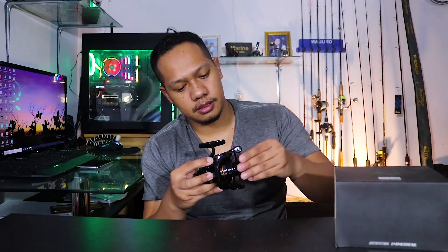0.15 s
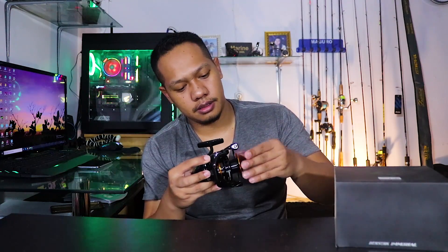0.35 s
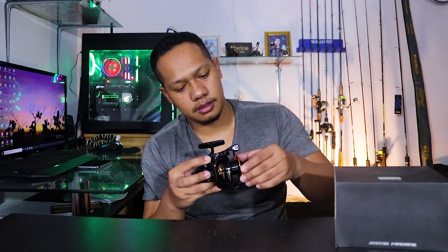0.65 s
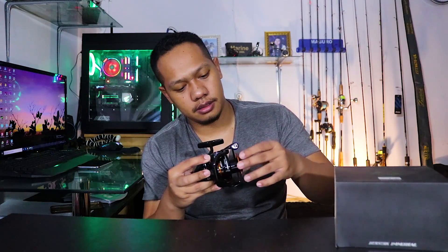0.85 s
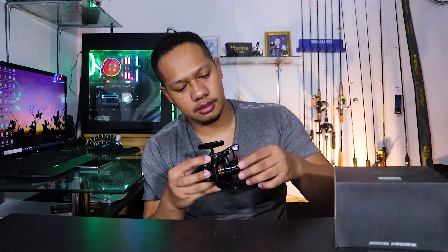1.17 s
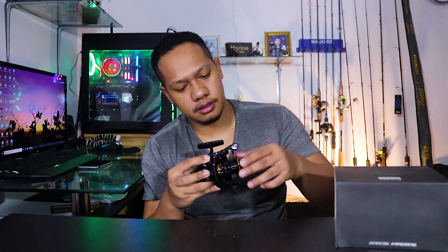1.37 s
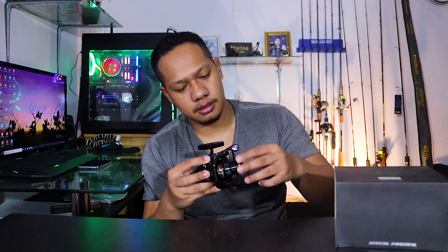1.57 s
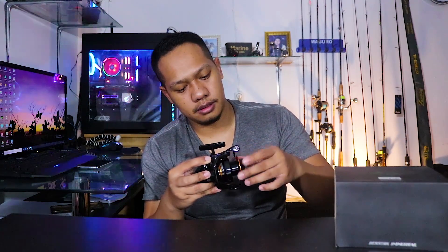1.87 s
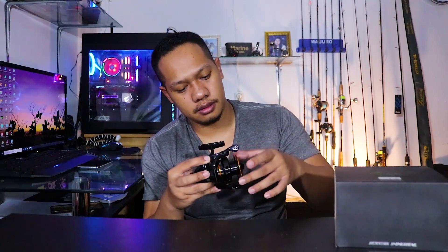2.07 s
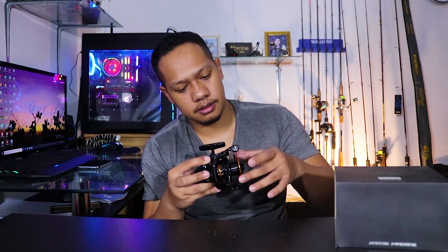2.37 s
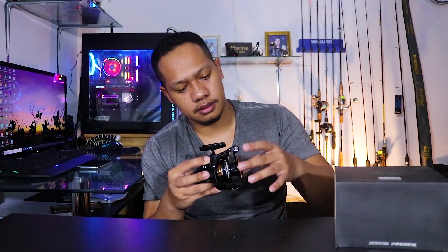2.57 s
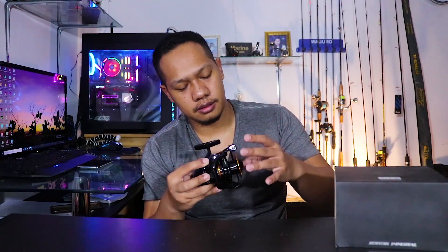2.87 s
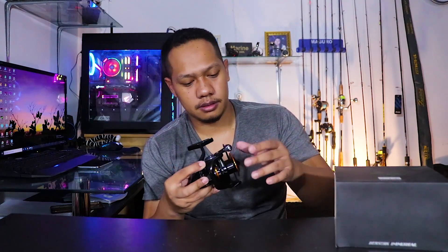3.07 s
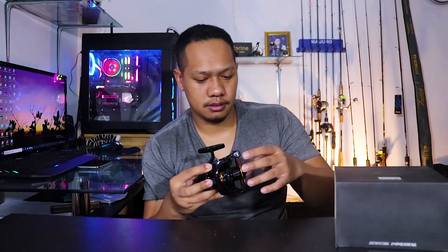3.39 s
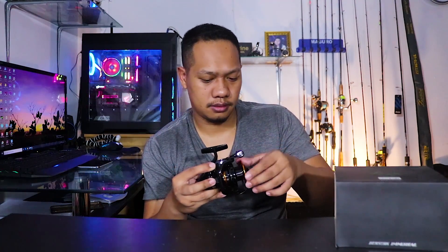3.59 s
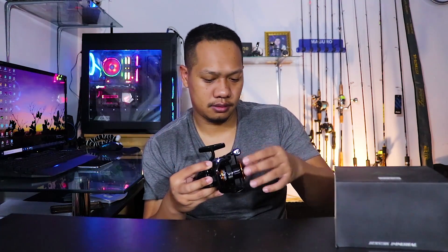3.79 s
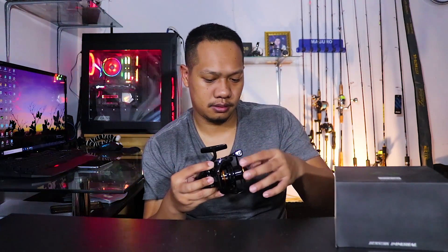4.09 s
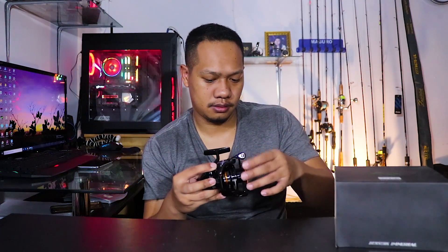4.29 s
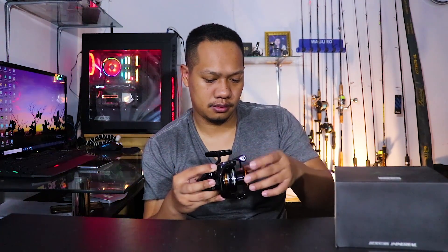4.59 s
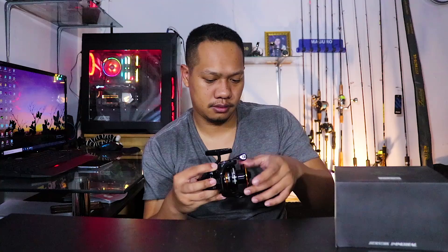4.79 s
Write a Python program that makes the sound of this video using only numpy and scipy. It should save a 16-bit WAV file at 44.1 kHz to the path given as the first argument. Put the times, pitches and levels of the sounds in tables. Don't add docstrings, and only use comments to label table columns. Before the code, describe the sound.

A close, dry stereo pickup in a small quiet room, with low computer fan hum and soft hiss throughout. A faint finger tick leads to one crisp metallic snap at 0.17 s, then weak slips until 0.3. Softer slipping clicks come around 0.8-0.9. Four hard, bright snaps run from 1.29 to 1.39, three more near 1.67-1.70, and four at 1.97-2.04. Around 2.3-2.4 three snaps are looser, with a clear thin high whistle just after 2.0 and 2.3. Lighter triplets fall at 2.57-2.61 and 2.85-2.89. From 3 to 3.7 it is mostly fans, with tiny slips near 3.4 and finger ticks. Strong four-click runs return at 3.75-3.82 and 4.07-4.13, then weaker clicks around 4.4 and faint slips at 4.7. Each run leaves a thin, wavering metallic ring, cut off by the next grip.

```python
import sys
import numpy as np
from scipy import signal
from scipy.fft import rfft, irfft, next_fast_len
from scipy.io import wavfile
from scipy.ndimage import uniform_filter1d

SR = 44100
rng = np.random.default_rng(int(sys.argv[2]) if len(sys.argv) > 2 else 0)


def unload_wav(signal):
    wavfile.write(
        sys.argv[1],
        SR,
        np.round(np.clip(np.atleast_2d(signal).T, -1, 1) * 32767).astype(np.int16),
    )


def amplitude_ratio(level_db):
    exponent = np.asarray(level_db, float) / 20
    return 10 ** exponent


N = 218030

# t/s, body crack level/dB, spool lip and spool skirt re crack/dB
SNAPS = [(0.1676, -23, -3.5, 0), (1.2876, -16.5, -10, 9), (1.3142, -16.5, -1, 2), (1.343, -15, -3, 1.5),
         (1.3877, -18, -14, 3.5), (1.6655, -14.5, -23, 10.5), (1.682, -17, -9, 9),
         (1.7013, -17.5, -23, 9.5), (1.969, -17, -17, 7.5), (1.9952, -13.5, -16, 5.5),
         (2.0124, -19.5, -9, 9), (2.037, -21.5, -1, 1), (2.3049, -17.5, -9, 4), (2.3257, -21.5, -10, -1),
         (2.3977, -26, -1.5, 0), (2.5745, -24, 0, 10), (2.5901, -24, -21, 6), (2.6077, -26, -8, -3),
         (2.8509, -22.5, -19, -5), (2.876, -22, -5, 2), (2.892, -20, -5.5, -2), (3.7486, -14, -28, 6),
         (3.7652, -16, -6.5, 17), (3.785, -18, -29, 12), (3.8227, -19.5, -3, 13.5),
         (4.0747, -12.5, -24, -3), (4.0891, -20.5, -6, 12), (4.1047, -21.5, 1, 12.5),
         (4.1272, -20.5, -30, 6), (4.4009, -24.5, -2, -6)]
# t/s, body crack level/dB, spool lip and spool skirt re crack/dB
SLIPS = [(0.197, -33.5, -11, 5), (0.202, -34.5, -0.5, -8), (0.224, -55, -12, -13), (0.229, -49, -11, -10),
         (0.258, -37, 2, -11), (0.3148, -26.5, -10, -1), (0.7904, -28.5, -2, 10.5), (0.8272, -32, -4.5, 10),
         (0.8522, -31, -8, 3), (0.8588, -27, -10, 1), (0.8853, -31.5, -14, -4), (0.896, -34, -3, 3),
         (2.6, -34, -5, -4), (2.843, -30.5, -6, -12), (2.8699, -26, -22, -11), (2.9117, -34, -1.5, 1),
         (3.412, -35, -7.5, 3), (3.4314, -48, -7, -10), (3.439, -47, -5, 0), (3.853, -49, 9, 21),
         (4.065, -40, -13, -16), (4.1598, -41.5, 6, -12), (4.3744, -27, -12, 3), (4.3957, -35, 6, -7),
         (4.4204, -31, -5, 5.5), (4.4427, -34.5, 4, -2), (4.6885, -35.5, 0, 8), (4.7052, -36.5, 7.5, 9),
         (4.7091, -28, -5.5, -6), (4.7325, -39, -11, 0)]
# t/s, body crack level/dB, frame knock re crack/dB
FINGER_TICKS = [(0.1482, -42.5, -4), (0.2893, -42, -15), (0.4121, -49, -13), (0.754, -48, -8),
                (0.776, -40, -27), (1, -46.5, -9), (1.2213, -49, -9), (1.2387, -47, -1.5),
                (1.6343, -44, -1), (1.6397, -40, -6), (1.6553, -39, -9), (2.277, -38, -17),
                (2.29, -35.5, -3), (2.481, -46, -12), (2.5396, -49, -9), (2.5488, -45, 1.5),
                (2.557, -41.5, -14), (3.3774, -55, 4), (3.488, -43.5, -13), (3.7153, -44, -15),
                (3.7223, -31.5, -10.5), (3.728, -40, -11), (3.7403, -41, -18), (4.0454, -36.5, -18),
                (4.056, -33.5, -4), (4.2257, -46, -13), (4.3719, -37, -6.5), (4.6656, -35.5, -12),
                (4.6767, -42, -3), (4.7854, -54, -11)]
# f/Hz, level/dB, t60/s
BODY_MODES = [(5395, -14, 0.0023), (5900, -9, 0.0055), (6687, -1.5, 0.0056), (7600, 0, 0.004),
              (8210, -3.5, 0.0036), (9250, -6, 0.017), (4640, -7.5, 0.0022), (3940, -15.5, 0.011)]
# f/Hz, level/dB, t60/s
FRAME_MODES = [(1490, -16, 0.01), (2138, -2.5, 0.0053), (2564, -0.5, 0.0083), (3020, -1, 0.0048),
               (3260, -8, 0.0029)]
# f/Hz, level/dB, t60/s
LIP_MODES = [(9600, -1, .026), (9655, -4, .04), (9628, -16, .14)]
# f/Hz, level/dB, t60/s
SKIRT_MODES = [(12085, -19, .07), (12170, 1, .008), (12330, -4, .007), (11700, -5, .005), (12900, -8, .005)]
# f/Hz, level/dB, t60/s
SPRING_MODES = [(14265, -8, .028), (14400, -4, .006), (15600, -6, .007), (13600, -7, .005),
                (15000, -6, .005), (16200, -17, .004)]
# f/Hz, level/dB, t60/s
RIM_MODES = [(10990, 1, 0.0026), (10270, 5.2, 0.0023), (9820, 6, 0.01), (9780, 5, 0.0023)]
# t/s, peak level/dB of lower tone, of upper tone
SINGING = [(0.166, -51.5, -54), (0.317, -63, -53.5), (0.791, -50.5, -52), (0.884, -57, -47.5),
           (1.289, -44.5, -66), (1.349, -41, -46), (1.667, -44, -64), (1.715, -44, -68), (1.97, -52, -52),
           (2.014, -46, -53), (2.089, -54.5, -69), (2.307, -44, -54), (2.335, -43.5, -54),
           (2.401, -49, -50), (2.574, -48, -67), (2.616, -46.5, -46.5), (2.853, -44.5, -67),
           (2.895, -50.5, -48), (3.45, -59, -60), (3.75, -45, -57), (3.802, -37, -56), (4.073, -41.5, -65),
           (4.135, -57, -45.5), (4.4, -50, -57), (4.708, -48, -65)]
# t/s, peak level/dB
WHISTLES = [(0.42, -60), (1.289, -50), (1.667, -52), (2.014, -26), (2.089, -46), (2.307, -26.5),
            (2.401, -34.5), (2.574, -58), (2.91, -34), (3.305, -58), (3.824, -49), (4.445, -61)]
# f/Hz, density level/dB per Hz
FLOOR_SPECTRUM = [(15, -44), (25, -11), (64, -6), (277, -11), (1370, -20.5), (4030, -27), (14800, -32),
                  (16000, -25.5)]
# f/Hz, bandwidth/Hz, level/dB
FAN_TONES = [(69.5, 13.4, -62.5), (117.3, 4.3, -68.5), (170.2, 5.8, -60), (171.5, 37, -67.5),
             (640, 34, -76.5), (1386, 50, -77)]
# f/Hz, correlation/0-1
FLOOR_LIKENESS = [(40, 0.08), (120, 1), (300, 0.25), (1000, 0.35), (3000, 0.39), (15000, 0.23)]


def contacts():
    rows = [(s, db, -17, lip, skirt, 0) for s, db, lip, skirt in SNAPS]
    rows += [(s, db, -17.5, lip, skirt, -0.5) for s, db, lip, skirt in SLIPS]
    rows += [(s, db, frame, -30, -11.5, -23) for s, db, frame in FINGER_TICKS]
    return np.array(rows)


def chatter(count, bounce_s, share, size=220):
    draw = rng.random((count, 2, size))
    happens = draw[:, 0] < share
    strength = 2 * draw[:, 1] - 1
    force = happens * strength * np.exp(-np.arange(size) / SR / bounce_s)
    force[:, 0] = 0.86
    return force / np.sqrt(np.sum(force ** 2, axis=1, keepdims=True))


def ring(force, hz, t60_s):
    r = amplitude_ratio(-60 / (t60_s * SR))
    w = 2 * np.pi * hz / SR
    return signal.lfilter([0, np.sin(w)], [1, -2 * r * np.cos(w), r * r], force + 1e-18)


def reel():
    rows = contacts()
    blows = chatter(count=len(rows), bounce_s=0.0018, share=0.1)
    blow_n = np.arange(blows.shape[1])
    where = (rows[:, :1] * SR).astype(int) + blow_n

    parts = [BODY_MODES, FRAME_MODES, LIP_MODES, SKIRT_MODES, SPRING_MODES, RIM_MODES]
    part_gain_db = [2.64, 8.7, 13.3, 4.76, 7.5, 5.9]
    body_db = np.zeros(len(rows))
    rim_db = np.minimum(rows[:, 4:].max(axis=1) + 1.8, 0)
    part_db = rows[:, 1:2] + np.c_[body_db, rows[:, 2:], rim_db] + part_gain_db

    spot = rng.standard_normal((len(rows), 40))
    aim = rng.standard_normal(40)
    out = np.zeros((2, N))
    k = 0
    for modes, level_db in zip(parts, part_db.T):
        for hz, mode_db, t60_s in modes:
            fed = np.abs(blows @ np.exp(2j * np.pi * hz / SR * blow_n))
            strength = amplitude_ratio(level_db + mode_db + 1.44 * spot[:, k]) / np.sqrt(fed ** 2 + 0.3)
            force = np.bincount(where.ravel(), (blows * strength[:, None]).ravel(), N)
            side_db = np.array([[1], [-1]]) * (0.65 * aim[k] - 0.83)
            out += (-1) ** k * amplitude_ratio(side_db) * ring(force, hz, t60_s)
            k += 1
    too_small_for_bass = signal.butter(4, 1700, "high", fs=SR, output="sos")
    return signal.sosfilt(too_small_for_bass, out)


def singing(rows, tones_hz, t60s_s):
    swell_s, damp_s = 0.012, 0.0038
    out = np.zeros(N)
    starts_s = [row[0] for row in rows] + [N / SR]
    for (s, *levels_db), grip_s in zip(rows, starts_s[1:]):
        first, last = round(s * SR), round(grip_s * SR)
        t = np.arange(first, last) / SR - s
        shape = (1 - np.exp(-t / swell_s)) * np.minimum((t[-1] - t) / damp_s, 1)
        for level_db, hz, t60_s, sign in zip(levels_db, tones_hz, t60s_s, (1, -1)):
            decay = amplitude_ratio(level_db - 60 * t / t60_s)
            out[first:last] += sign * decay * shape * np.sin(2 * np.pi * hz * t)
    return out


def hand_reflection(middle):
    return amplitude_ratio(-31) * np.roll(middle, round(0.0004 * SR)) * [[1], [-1]]


def room(x):
    t60_s, level_db, top_hz = 0.27, -13.5, 9700
    t = np.arange(round(0.5 * SR)) / SR
    tail = rng.standard_normal((2, len(t))) * amplitude_ratio(-60 * t / t60_s) * (1 - np.exp(-t / 0.001))
    tail = signal.lfilter(*signal.butter(1, top_hz, fs=SR), tail)
    tail = amplitude_ratio(level_db) * tail / np.sqrt(np.sum(tail ** 2) / 2)
    return signal.fftconvolve(x[None], tail, axes=1)[:, :N]


def rms_one(x):
    return x / np.sqrt(np.mean(x ** 2) + 1e-20)


def at_hz(points, hz):
    table_hz, value = np.array(points)[:, :2].T
    return np.interp(np.log(hz), np.log(table_hz), value)


def fans_and_hiss():
    size = next_fast_len(N)
    hz = np.maximum(np.fft.rfftfreq(size, 1 / SR), 1)
    mid, side = rfft(rng.standard_normal((2, size)), axis=1)
    alike = np.clip(at_hz(FLOOR_LIKENESS, hz), 0, 1)
    white = np.sqrt(1 + alike) * mid + np.sqrt(1 - alike) * side * [[1], [-1]]
    out = amplitude_ratio(-50.5) * rms_one(irfft(white * amplitude_ratio(at_hz(FLOOR_SPECTRUM, hz)), size))
    for tone_hz, width_hz, level_db in FAN_TONES:
        resonance = 1 / (1 + ((hz - tone_hz) / (width_hz / 2)) ** 2)
        out += amplitude_ratio(level_db) * rms_one(irfft(white * resonance, size))
    return out[:, :N] * amplitude_ratio([[-0.8], [0.8]])


def scene():
    near = reel()
    near = near + singing(SINGING, tones_hz=(4066, 4086), t60s_s=(0.49, 0.3))
    near = near + singing(WHISTLES, tones_hz=(10248,), t60s_s=(0.21,))
    middle = near.mean(axis=0)
    far = room(middle) + fans_and_hiss()
    far_lowpass = signal.ellip(8, 0.5, 50, 15700, fs=SR, output="sos")
    return near + hand_reflection(middle) + signal.sosfilt(far_lowpass, far)


def low_pass(x):
    return signal.sosfilt(signal.butter(12, 17010, fs=SR, output="sos"), x)


def record(dry):
    threshold_db, release_db_per_s = -9.5, 90
    level_db = 20 * np.log10(np.abs(dry).max(axis=0) + 1e-9)
    slope_db = release_db_per_s * np.arange(N) / SR
    held_db = np.maximum.accumulate(level_db + slope_db) - slope_db
    duck_db = uniform_filter1d(-0.4 * np.maximum(held_db - threshold_db, 0), size=90)
    x = 1.02 * np.tanh(dry * amplitude_ratio(duck_db) / 0.77)
    x = signal.sosfilt(signal.cheby2(10, 50, 16950, fs=SR, output="sos"), x)
    return low_pass(x)


dry = scene()
out = record(dry)
unload_wav(out)
```